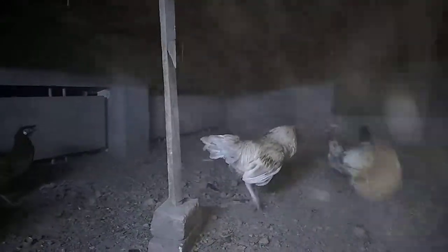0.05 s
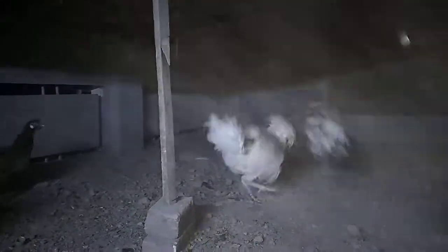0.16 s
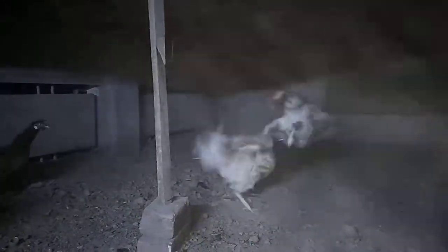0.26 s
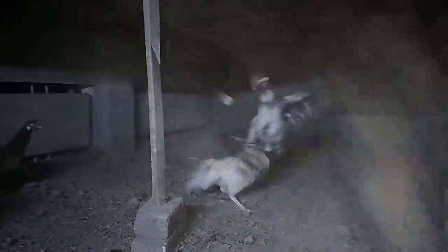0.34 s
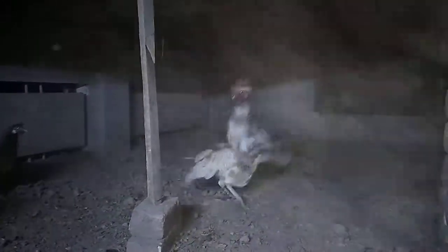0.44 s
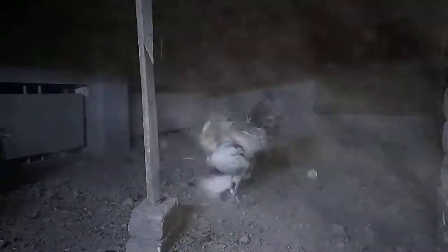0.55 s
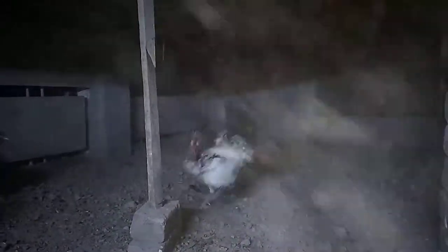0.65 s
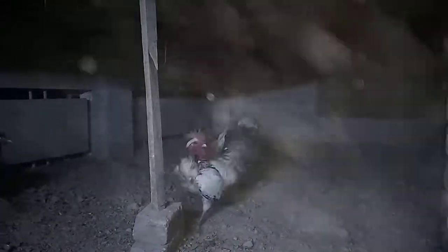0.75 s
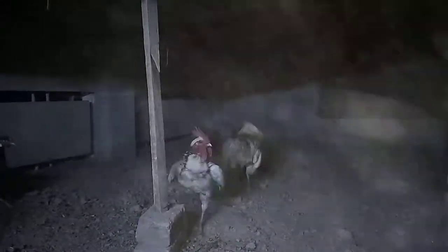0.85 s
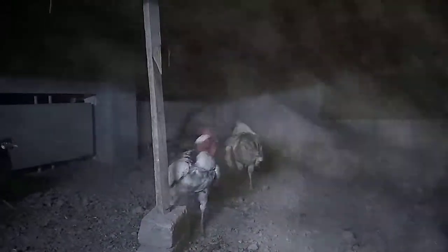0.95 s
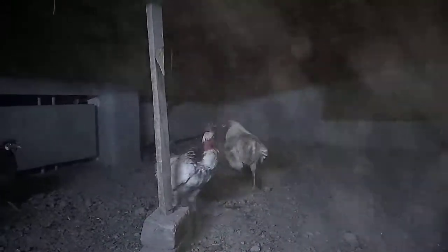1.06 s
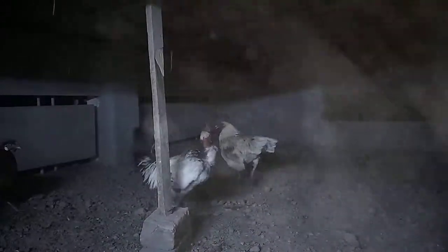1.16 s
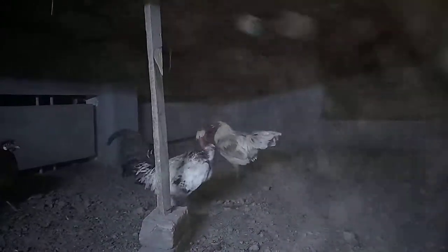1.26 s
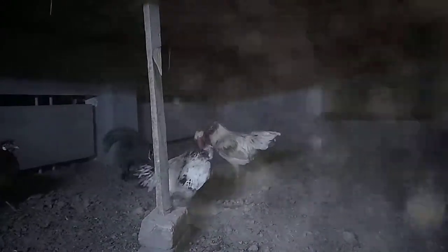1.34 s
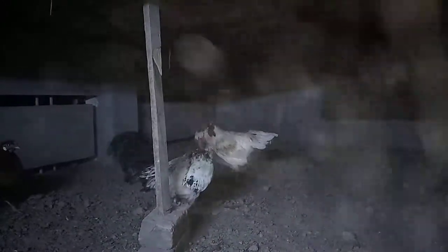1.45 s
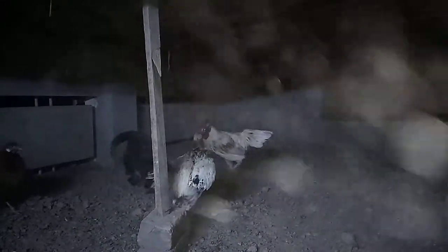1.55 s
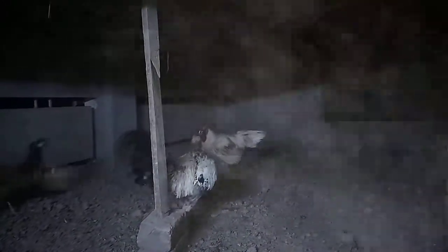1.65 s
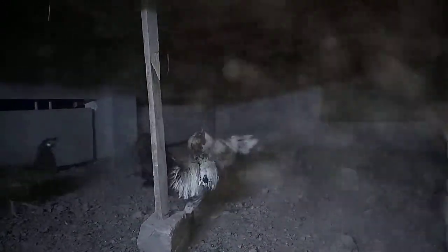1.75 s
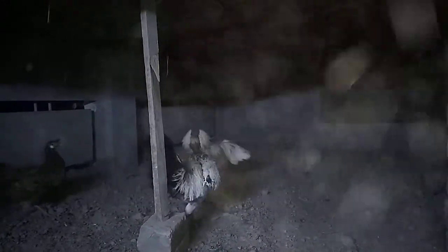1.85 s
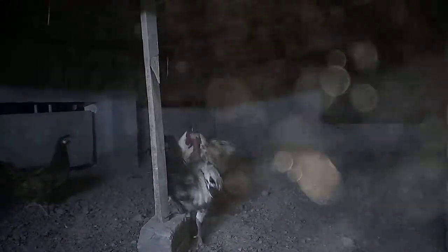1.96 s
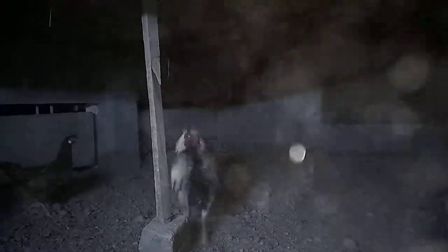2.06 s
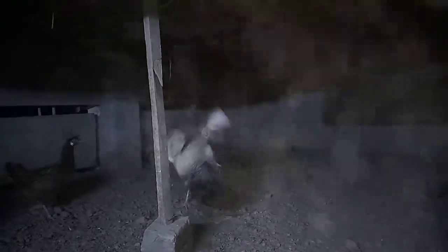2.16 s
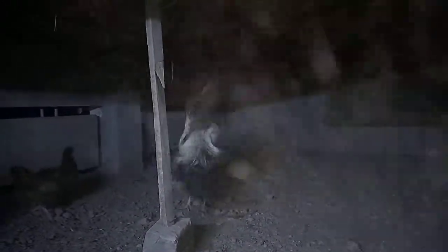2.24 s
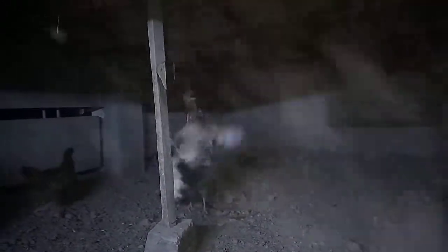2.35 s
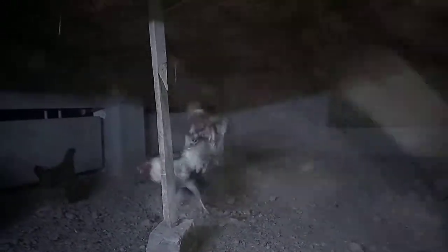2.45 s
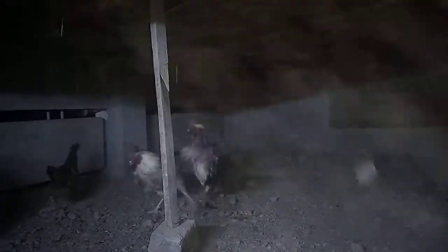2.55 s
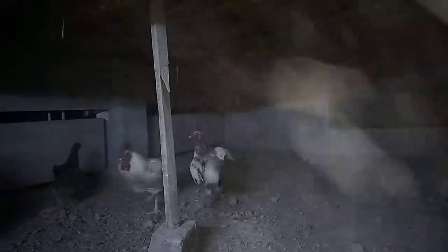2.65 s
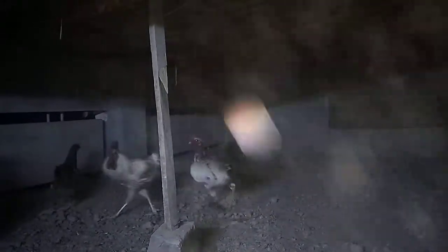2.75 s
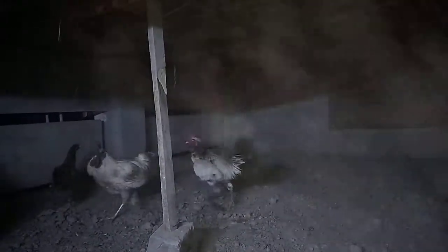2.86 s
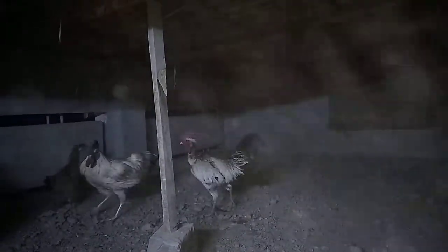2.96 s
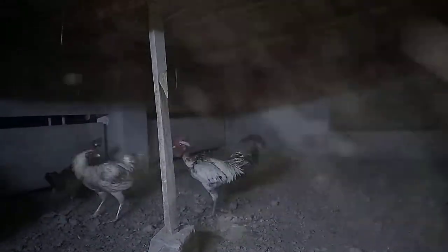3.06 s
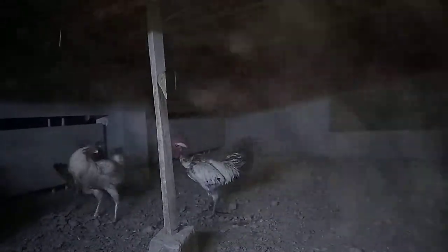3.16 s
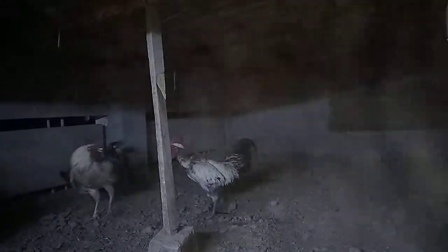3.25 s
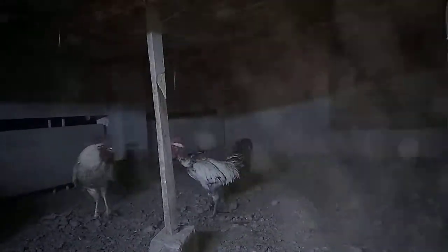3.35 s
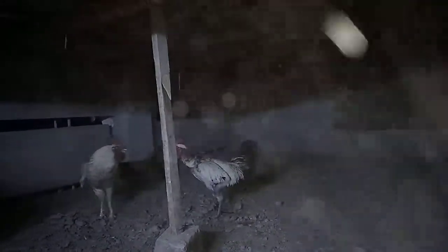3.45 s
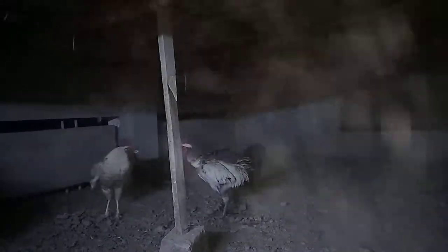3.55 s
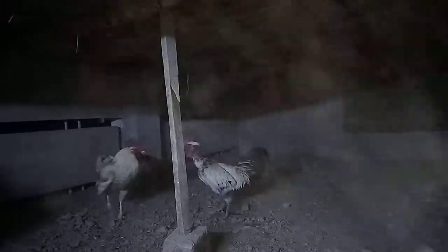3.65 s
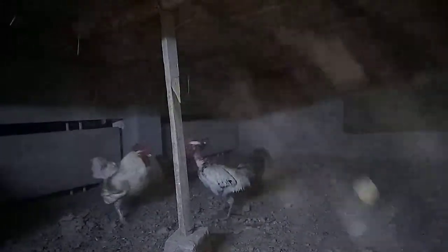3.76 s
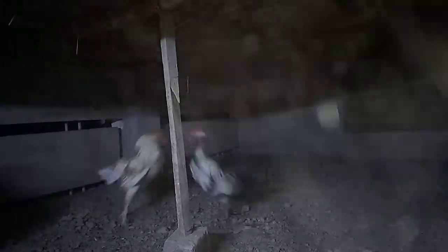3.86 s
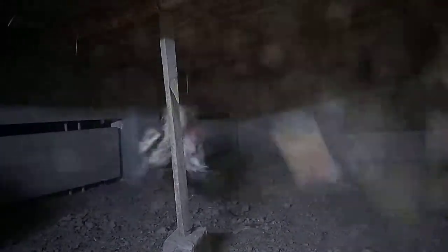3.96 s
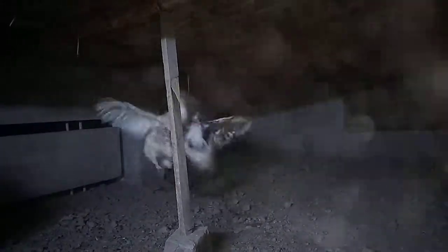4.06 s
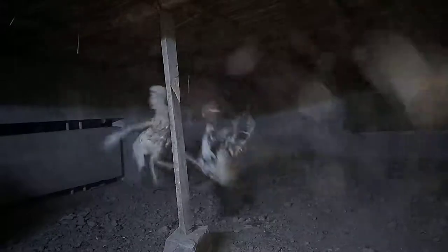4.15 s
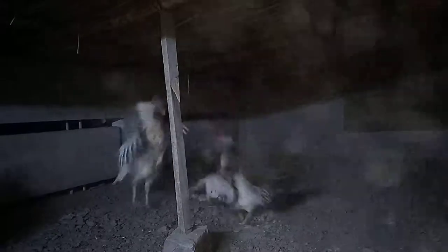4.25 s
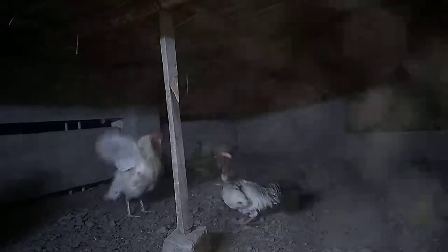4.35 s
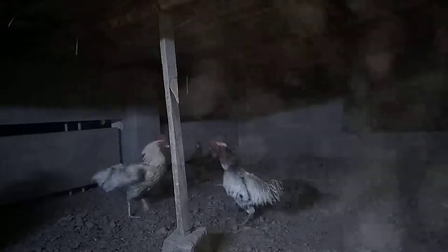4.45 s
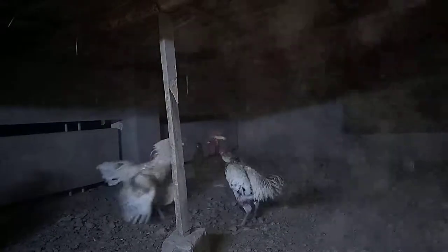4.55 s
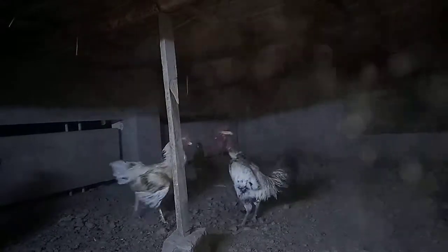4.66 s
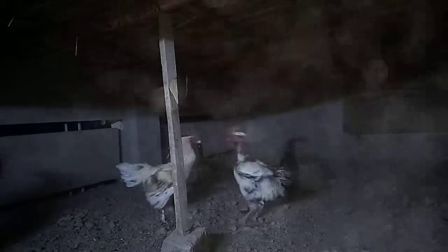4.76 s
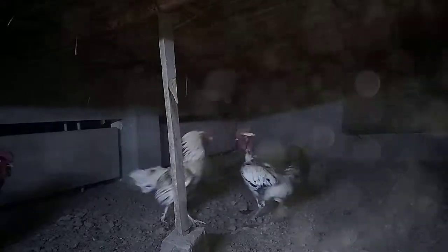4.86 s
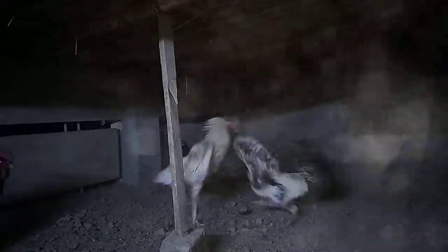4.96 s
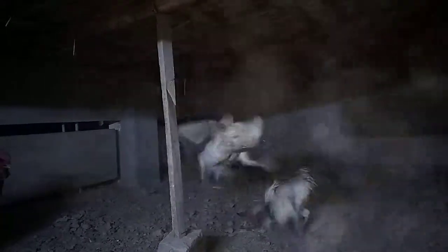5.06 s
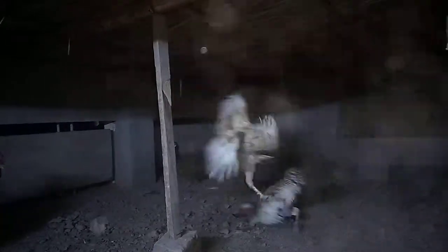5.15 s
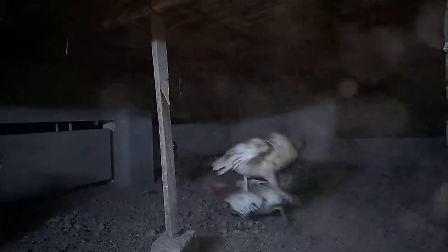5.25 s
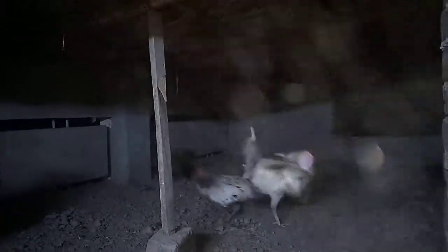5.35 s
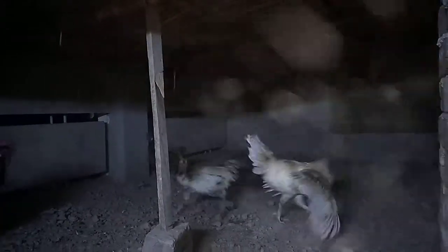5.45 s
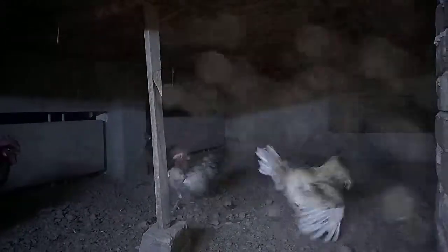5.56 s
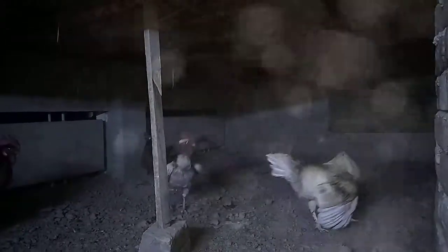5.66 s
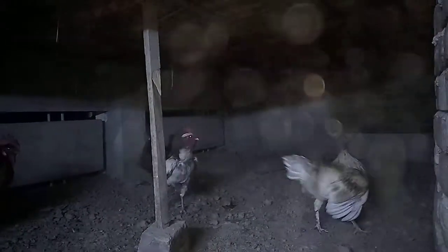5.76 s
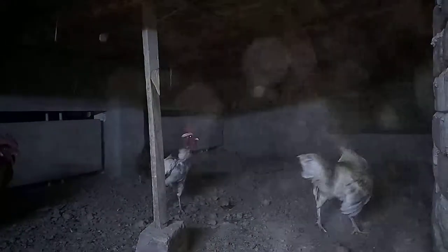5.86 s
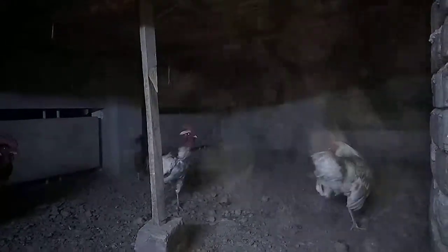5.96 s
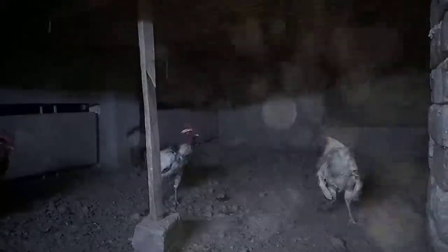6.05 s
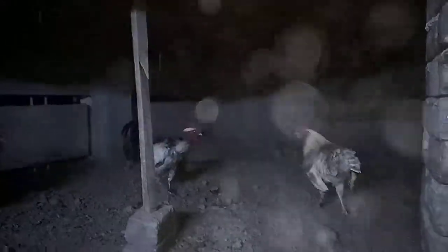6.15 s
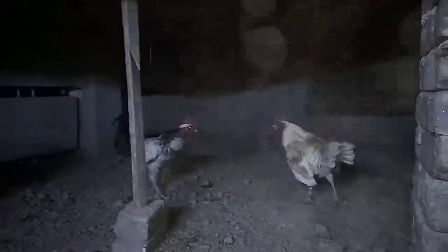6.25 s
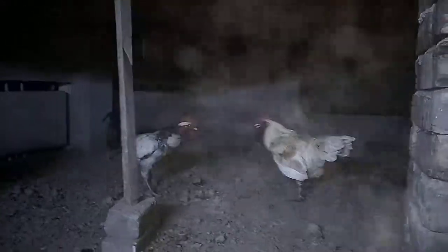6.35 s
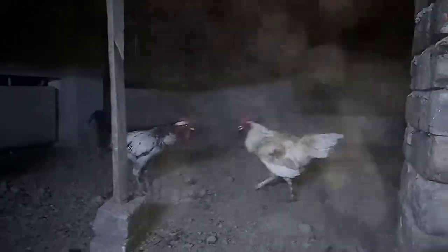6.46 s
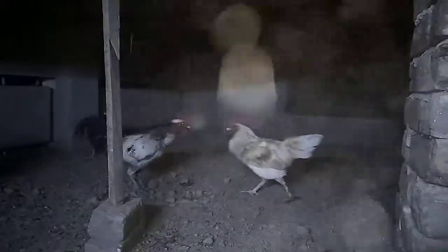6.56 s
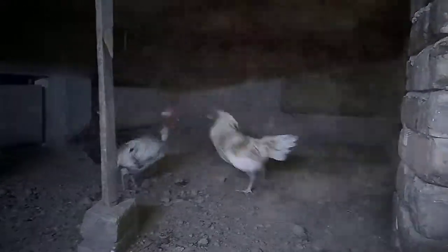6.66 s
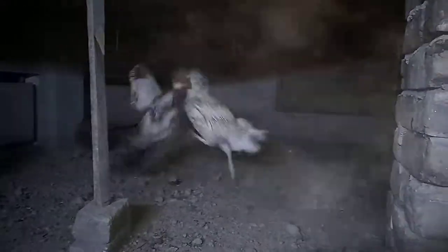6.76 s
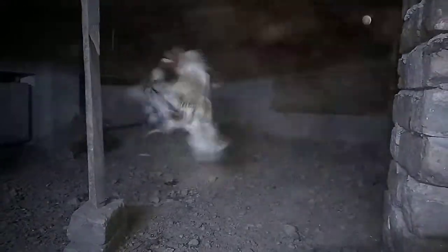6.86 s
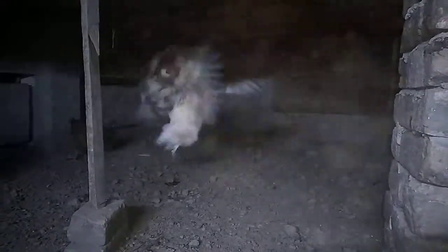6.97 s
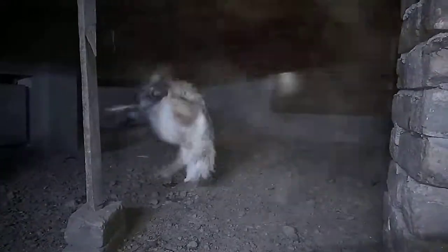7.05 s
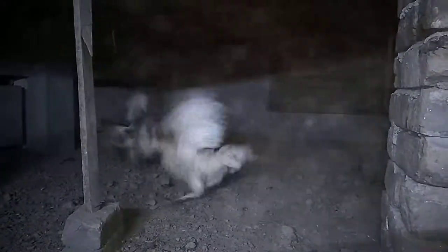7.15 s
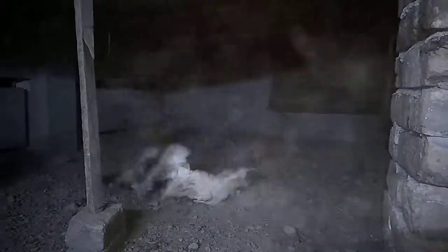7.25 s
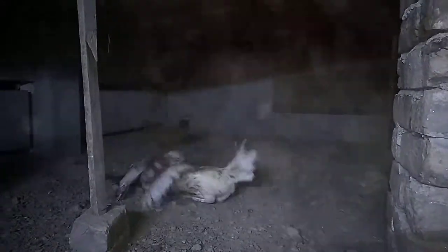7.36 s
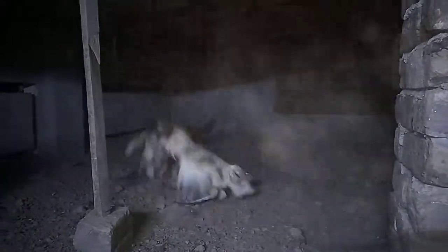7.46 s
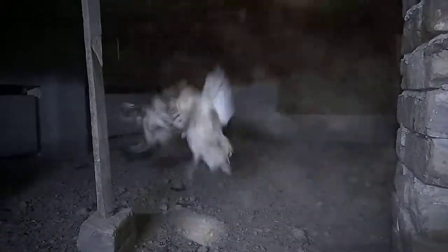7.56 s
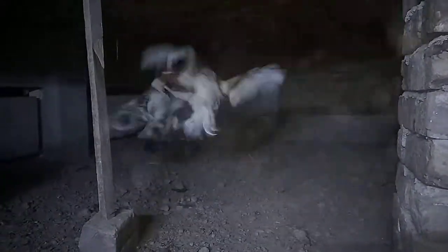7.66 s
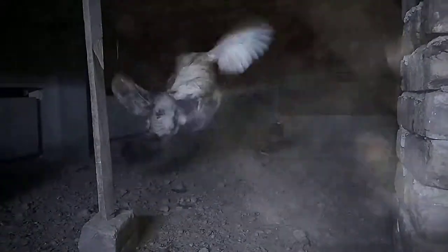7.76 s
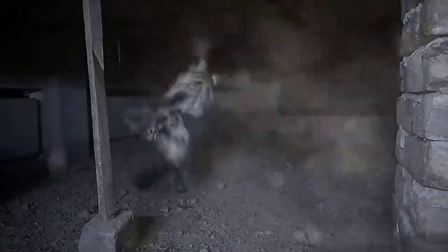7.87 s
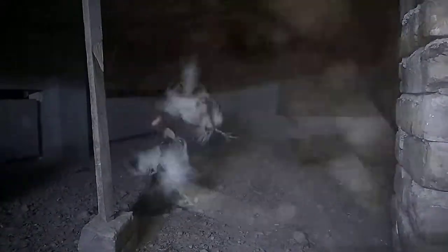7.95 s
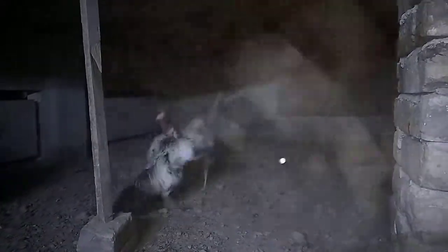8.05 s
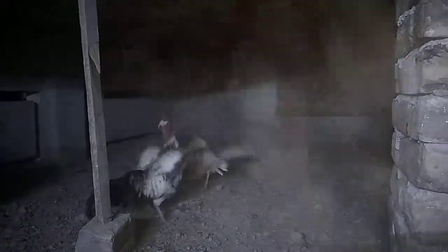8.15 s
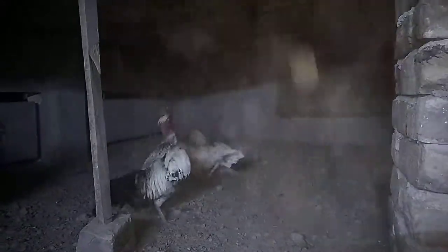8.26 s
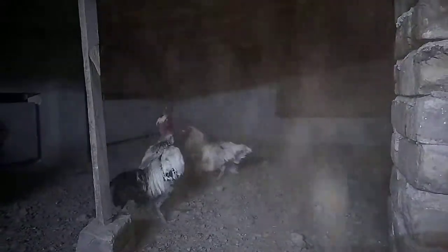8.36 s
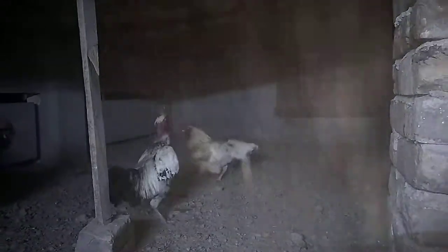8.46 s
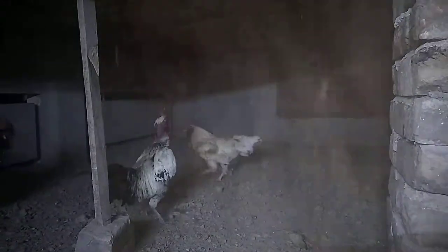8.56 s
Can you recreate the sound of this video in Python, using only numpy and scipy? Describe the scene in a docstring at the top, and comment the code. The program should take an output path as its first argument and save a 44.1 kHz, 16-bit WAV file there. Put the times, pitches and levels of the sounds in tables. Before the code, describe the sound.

Two roosters fight on the dirt floor of a low shed. A hard flurry of wing slaps comes at once, then more bursts with feathery hiss, dull footfalls and rustling plumage. Hens cluck, yelp and whine softly in the lulls. After the densest flurry, a rooster crows very loudly near the microphone, its last clear note still sounding at the end. Short wall echoes, faint outdoor air.

```python
"""From the start, dull footfalls (struck low modes), soft clucks and yelps (pulse tones through a throat
resonance) and flurries of wingbeats (enveloped noise and damped hollow smacks) are heard: two roosters fight in
a low shed. Feathers rustle (crackling noise) throughout; hens also whine softly between the bouts, and at 3.7 s
a distant rooster calls faintly. Near the end a rooster crows close by (summed partials), hoarse at first, then
on one clear note still held as the scene stops. Short echoes answer the birds' voices and feathers, over faint
outdoor air (coloured noise)."""
import sys
import numpy as np
from scipy import signal
from scipy.fft import rfft, irfft, next_fast_len
from scipy.io import wavfile
from scipy.ndimage import uniform_filter1d, minimum_filter1d

SR = 44100
rng = np.random.default_rng(int(sys.argv[2]) if len(sys.argv) > 2 else 0)


def to_wav(sig):
    """Store sig (one row per channel, or 1-D mono) as 16-bit WAV at the path in sys.argv[1].

    Samples outside -1..1 are clipped; the rate is SR.
    """
    pcm = np.clip(np.atleast_2d(sig), -1, 1) * 32767
    pcm = np.round(pcm).astype(np.int16)
    wavfile.write(sys.argv[1], SR, pcm.T)  # frames by channels


N = 379686
TIME = np.arange(N) / SR

# All levels and gains in the tables are relative.
# noise spectrum of the outdoor air: (frequency [Hz], level [dB])
AIR_SPECTRUM = [(30, -26), (60, -12), (110, 1.5), (200, -5.5), (290, -18), (450, 0), (800, -6),
                (1100, -8.5), (1500, -6), (2200, -13), (5000, -21.5), (15000, -20.5)]
# likeness of left and right noise: (frequency [Hz], correlation [-1 to 1])
SIDE_LIKENESS = [(60, 0.95), (250, 0.97), (700, 0.62), (1500, 0.042), (4000, 0.021), (12000, 0.04)]
# left minus right level of the noise: (frequency [Hz], difference [dB])
SIDE_BALANCE = [(60, -1), (300, -4), (1000, 1.5), (4000, -3.5), (12000, 1.5)]
# wall echoes: (delay [s], left gain [dB], right gain [dB])
WALL_ECHOES = [(.0043, -14, -19), (.0079, -19, -13), (.0137, -14, -18), (.0191, -19, -15),
               (.0322, -12, -13)]
# low clucks of the hens: (time [s], level [dB], throat resonance [Hz])
HEN_CLUCKS = [(0.047, -40, 526), (0.233, -32, 780), (1.163, -30.5, 757), (3.342, -31.5, 640),
              (3.526, -31, 640), (4.56, -58.5, 890), (5.895, -58, 650), (5.96, -57, 560), (6.006, -42, 810),
              (7.33, -35.5, 664)]
# short falling yelps: (time [s], pitch [Hz], level [dB], throat resonance [Hz], roughness [0-1])
HEN_YELPS = [(0.539, 569, -46, 560, 0.67), (1.353, 512, -43.5, 640, 0.31), (1.538, 475, -42.5, 1050, 0.56),
             (2.584, 660, -43, 1250, 0.19), (2.605, 530, -46, 1020, .1), (4.363, 610.5, -34.5, 1160, 0.18),
             (4.378, 490.3, -43, 910, 0.68), (4.49, 584, -54, 555, 0.55), (4.742, 497, -47.5, 1110, 0.44),
             (6.098, 677, -46, 593, 0.37), (6.118, 495, -48, 1450, 0.23), (6.283, 536, -49.5, 724, 0.28),
             (6.488, 563, -47.5, 710, 0.24), (7.178, 569, -38.5, 1080, 0.45)]
# soft whines of the hens, plus one faint call of a distant rooster (the row at 3.682 s): (time [s], length [s],
# pitch [Hz], fall [share of pitch], level [dB], throat resonance [Hz])
WHINES_AND_FAR_CALL = [(1.382, 0.24, 511, 0.25, -51.5, 624), (2.01, 0.12, 509, 0.18, -53, 770),
                       (2.634, 0.12, 504, 0.16, -60, 980), (2.709, 0.084, 423, -0.041, -45.5, 1250),
                       (2.763, 0.17, 410.5, .055, -58.5, 770), (3.398, 0.14, 451.4, -0.07, -56.5, 755),
                       (3.586, 0.049, 411, -0.018, -52, 1040), (4.891, 0.086, 444, -0.27, -49, 870),
                       (5.359, .094, 438, 0.45, -51.5, 420), (3.682, 0.074, 772, .01, -69, 1540),
                       (5.489, 0.056, 456, 0.034, -57.5, 900), (6.038, 0.093, 523, 0.043, -51.5, 1000),
                       (6.151, .17, 492, 0.13, -54, 810)]
# three crowed notes, one pitch curve each: (time [s], pitch [Hz])
CROW_PITCH_CURVES = [
    [(7.378, 584), (7.43, 688.6), (7.475, 717.5), (7.555, 734.5), (7.615, 584)],
    [(7.668, 590), (7.697, 805), (7.73, 800), (7.775, 630), (7.797, 735), (7.848, 742), (7.885, 610),
     (7.942, 965), (7.985, 930)],
    [(7.96, 723.1), (8.13, 764.3), (8.18, 751.4), (8.255, 691.2), (8.31, 722.1), (8.44, 745), (8.52, 740.8),
     (8.9, 713)],
]
# one entry for each crowed note: level [dB]
CROW_NOTE_LEVELS = [-16.5, -13.5, -13]
# overtone levels: (time [s], second partial [dB], third partial [dB], higher partials [dB])
CROW_OVERTONE_LEVELS = [(7.378, 0, 7.5, 2.5), (7.47, -2.5, -11.5, 0.5), (7.72, 4.5, -0.5, 3),
                        (7.9, 4.5, 0, 2.5), (8.14, 0, -4.5, -3.5), (8.3, 7, 6.5, 10.5),
                        (8.371, 0, -0.5, -2.5), (8.6, -6.5, -1, -7.5)]
# throat and beak response of the crow: (frequency [Hz], level [dB])
CROW_THROAT_RESPONSE = [(550, -8), (740, -0.5), (1450, 0), (1850, -8.5), (2250, -2), (2500, -6.5),
                        (2950, -30), (3650, -6), (4400, -34.5), (5200, -26), (6500, -34), (8200, -31.5),
                        (9600, -39.5), (11000, -32), (15500, -38.5)]
# phase lead of the left side over the right in the crow: (frequency [Hz], lead [rad])
CROW_LEFT_LEAD = [(740, 0.1), (1480, -2.5), (2220, -0.5), (3700, 0.7), (5200, -1.5), (9000, 2)]
# heaviest footfalls: (time [s], level [dB])
HEAVY_STEPS = [(0.016, -45), (0.721, -56), (1.068, -52), (1.295, -50), (1.388, -47), (1.659, -46),
               (1.699, -40), (1.799, -46), (2.85, -49.5), (3.646, -42.5), (4.222, -43), (4.37, -40.5),
               (4.451, -44.5), (4.57, -47), (4.947, -46.5), (5.477, -46.5), (5.57, -46.5), (6.219, -47.5),
               (3.1, -50.5), (5.23, -54), (5.875, -51), (5.972, -51), (6.44, -52), (6.64, -53),
               (6.759, -44.5), (7.8, -40), (7.95, -46), (8.16, -40)]
# single shifts of the feathers: (time [s], level [dB])
FEATHER_SHUFFLES = [(0.084, -52), (0.555, -50), (0.65, -50.5), (0.98, -56), (1.97, -52.5), (2.04, -53.5),
                    (2.098, -49), (2.52, -46.5), (2.82, -58), (3.2, -62), (3.94, -50.5), (5.085, -46),
                    (5.6, -54.5), (5.75, -63), (6.65, -55), (6.78, -49)]
# wingbeats and kicks: (time [s], slap level [dB], feather hiss level [dB])
WING_STROKES = [(0.255, -20, -24.5), (0.294, -27, -28.5), (0.399, -38, -34.5), (0.489, -42.5, -42),
                (0.746, -46, -46), (1.026, -105, -47.5), (1.839, -59, -50), (2.205, -27, -42.5),
                (2.25, -29, -31.5), (2.329, -30.5, -32.5), (2.44, -41, -43), (2.556, -45.5, -52),
                (3.873, -56.5, -49), (3.996, -38, -44), (4.056, -33.5, -43), (4.094, -34, -32.5),
                (4.255, -42.5, -44), (4.302, -42.5, -48.5), (4.996, -29.5, -33), (5.149, -40.5, -42),
                (5.369, -50.5, -46), (5.52, -51.5, -49.5), (6.849, -37, -57), (6.886, -29.5, -29.5),
                (6.936, -28, -35.5), (6.983, -29, -35.5), (7.041, -24, -25.5), (7.128, -34.5, -42),
                (7.186, -33, -46), (7.263, -31, -39), (7.289, -30, -31.5), (7.323, -29, -41),
                (7.628, -26.5, -20.5)]
# noise spectrum of the air a wing shoves: (frequency [Hz], level [dB])
THUD_SPECTRUM = [(30, -18), (60, -0.5), (120, 1.5), (250, -1.5), (400, -8.5), (800, -31), (2000, -25.5)]
# noise spectrum of a wing slap: (frequency [Hz], level [dB])
SLAP_SPECTRUM = [(150, -18.5), (400, 4.5), (650, 0.5), (1200, -2.5), (2000, -3.5), (3000, -11.5),
                 (6000, -17.5), (15000, -29)]
# noise spectrum of feathers: (frequency [Hz], level [dB])
FEATHER_SPECTRUM = [(500, -18.5), (1500, -2), (2500, -4), (4200, -3.5), (6500, -2), (10000, 0), (13000, -8),
                    (16000, -8.5)]

CUTOFF_HZ = 15800
# fall: share of the pitch lost by the end
CLUCK_S, CLUCK_HZ, CLUCK_FALL, CLUCK_ROUGH = 0.035, 327.4, 0.098, 0.22
YELP_S, YELP_FALL = 0.048, 0.154
WHINE_ROUGH = 0.14
CROW_ATTACK_S, CROW_RELEASE_S = 0.011, 0.048
CROW_SETTLE = .13   # decay constant of the hoarse start, as a share of the note
CROW_FRAY_S = 0.057   # growth constant of the hoarseness towards a note's end
CROW_SWAY_HZ_PER_S = 620   # a glide this fast brings the sway of the partials to its most
CROW_BREAK_HZ_PER_S = 5760   # a glide this fast breaks the voice up entirely
LIGHT_STEP_S = .26   # mean spacing of the light steps, which go on throughout
LIGHT_STEP_DB, LIGHT_STEP_SPREAD_DB = -58.5, 1.5
RUSTLE_DB, RUSTLE_RISE_S, RUSTLE_T60_S = -17.5, 0.34, 0.71   # level is against the feather hiss of a beat
RUSTLE_LIMIT_DB = -50   # fully ruffled plumage
FIDGET_DB = -69   # birds that only stand and shift
THUD_DB, THUD_LIMIT_DB = -4, -27.5   # level against the slap, and the most that a wing can give
PAT_DB, PAT_SPAN_S, PAT_CYCLES = 0.5, .03, 14.3   # cycles: count in which a smack decays by 60 dB


def from_db(db):
    """Logarithmic level: convert decibels to amplitude gain."""
    return 10 ** (np.asarray(db) / 20)


def rms_one(x):
    """Normalisation: scale to unit mean power."""
    return x / np.sqrt(np.mean(x ** 2) + 1e-20)


def at_hz(points, hz):
    """Spectral interpolation: read a curve on a log-frequency axis."""
    f, value = np.transpose(points)
    return np.interp(np.log(hz), np.log(f), value)


def filtered(x, hz, kind):
    """Linear filtering: a Butterworth section of design order 2."""
    sections = signal.butter(2, hz, kind, fs=SR, output="sos")
    return signal.sosfilt(sections, x + 1e-18)


def wander(hz, count=N):
    """Band-limited chance: low-passed Gaussian noise of spread about 1."""
    # the first second lets the filter settle
    return rms_one(filtered(rng.standard_normal(count + SR), hz, "low"))[SR:]


def panned(x, pan_db):
    """Interaural level difference: place a sound by left minus right level."""
    return x * from_db(np.array([[.5], [-.5]]) * pan_db)


def placed(x, s):
    """Time shift: set a short sound at its moment in the scene."""
    return np.concatenate([np.zeros(int(s * SR)), x, np.zeros(N)])[:N]


def noise(spectrum):
    """Spectral shaping: coloured stereo noise of rms 1, its sides correlated in the bass."""
    size = next_fast_len(N)
    hz = np.maximum(np.fft.rfftfreq(size, 1 / SR), 1)
    mid, side = rfft(rng.standard_normal((2, size)))
    alike = np.clip(at_hz(SIDE_LIKENESS, hz), -1, 1)
    pair = np.sqrt(1 + alike) * mid + np.sqrt(1 - alike) * side * [[1], [-1]]
    bass_cut = hz ** 2 / (hz ** 2 + 25 ** 2)
    colour = from_db(at_hz(spectrum, hz)) * bass_cut
    balanced = panned(pair * colour, at_hz(SIDE_BALANCE, hz))
    return rms_one(irfft(balanced, size)[:, :N])


def strokes(times, levels_db, rise, t60):
    """Energy superposition: blows swell briefly, then decay exponentially; their powers add."""
    power = np.zeros(N)
    for s, db in zip(times, levels_db):
        near = slice(max(int((s - 2 * rise) * SR), 0), int((s + rise + t60) * SR))
        t = TIME[near] - s - rise / 2
        drop_db = np.maximum(-20 * t / rise, 60 * t / t60)
        power[near] += from_db(2 * (db - drop_db))
    return np.sqrt(power)


def crackle(depth_db, grain_hz):
    """Random amplitude modulation: quills snap past each other, breaking a hiss into tiny grains."""
    return rms_one(from_db(depth_db * np.clip(wander(grain_hz), -2.5, 2.5)))


def shed(x, wet_db, echo_db, t60=0.19, damping_hz=6000):
    """Reflection by convolution: distinct echoes from the near walls and a short dull tail."""
    t = TIME[:SR // 2]
    tail = rng.standard_normal((2, len(t))) * from_db(-60 * t / t60) * np.minimum(t / 0.0079, 1)
    tail = tail / np.sqrt(np.sum(tail ** 2) / 2)
    response = filtered(tail, damping_hz, "low") * from_db(wet_db)
    for delay, left_db, right_db in WALL_ECHOES:
        response[:, int(delay * SR)] += from_db(np.array([left_db, right_db]) + echo_db)
    return x + signal.fftconvolve(x, response, axes=1)[:, :N]


def outdoor_air():
    """Broadband background: steady coloured noise with a slightly wavering level."""
    return from_db(-63.0 + 1.6 * wander(12.0)) * noise(AIR_SPECTRUM)


def hen_call(s, length, start_hz, fall, db, throat_hz, rough, width_hz=330, jitter=0.12, rasp=0.8,
             skirt_db=-20, top_hz=1700):
    """Source-filter principle: a gliding pulse tone in one throat resonance, shaken in pitch and strength."""
    order = np.arange(1, 10)[:, None]
    count = int(length * SR)
    u = np.linspace(0, 1, count)
    arch = 1 + 0.045 * (np.sin(np.pi * u) - .7)   # pitch arches with the push
    pitch = start_hz * (1 - fall * u) * arch
    pitch = pitch * (1 + 0.016 * wander(20.4, count=count))
    shaken = pitch * (1 + jitter * rough * wander(178, count=count))
    phase = 2 * np.pi * np.cumsum(shaken) / SR
    hz = order * pitch
    throat = 1 / (1 + (2 * (hz - throat_hz) / width_hz) ** 2) + from_db(skirt_db)
    throat = throat / (1 + (hz / (top_hz * (0.55 + rough))) ** 6)   # a rougher call is also brighter
    voice = np.sum(throat * np.sin(order * phase), axis=0)
    voice = voice * (1 + rasp * rough * wander(340, count=count))
    swell = np.abs(np.sin(np.pi * u ** .8)) ** .9
    return placed(from_db(db + 0.5) * rms_one(voice) * swell, s)


def hens_and_far_rooster():
    """Common source-filter model: clucks, yelps and whines come from the same kind of throat, and so does the
    faint call of a distant rooster."""
    clucks = sum(hen_call(s, CLUCK_S, CLUCK_HZ, CLUCK_FALL, db, throat_hz, CLUCK_ROUGH, skirt_db=-26)
                 for s, db, throat_hz in HEN_CLUCKS)
    yelps = sum(hen_call(s, YELP_S, hz, YELP_FALL, db, throat_hz, rough, skirt_db=-15, top_hz=2080)
                for s, hz, db, throat_hz, rough in HEN_YELPS)
    whines = sum(hen_call(*row, WHINE_ROUGH) for row in WHINES_AND_FAR_CALL)
    return panned(filtered(clucks + yelps + whines, 210, "high"), pan_db=1.5)


def crow_note(curve, level_db, jitter=0.032, shake=0.44, half_tone=0.058, rasp_db=-13, sway_db=4, sway_hz=8):
    """Source-filter principle: the syrinx buzzes through throat and beak, its cycles unstable when hoarse."""
    s, curve_hz = np.transpose(curve)
    length = s[-1] - s[0]
    count = int(length * SR)
    age = np.arange(count) / SR
    pitch = np.interp(s[0] + age, s, curve_hz)
    glide = uniform_filter1d(np.abs(np.gradient(pitch)) * SR, size=900)   # Hz per s
    # a note is hoarse as it starts, ends or glides fast
    start = np.exp(-age / (CROW_SETTLE * length))
    end = np.exp((age - length) / CROW_FRAY_S)
    hoarse = np.minimum(start + end + glide / CROW_BREAK_HZ_PER_S, 1)
    moving = np.minimum(.5 + glide / CROW_SWAY_HZ_PER_S, 1.5)
    when, *overtones = np.transpose(CROW_OVERTONE_LEVELS)
    second_db, third_db, higher_db = (np.interp(s[0] + age, when, c) for c in overtones)
    phase = 2 * np.pi * np.cumsum(pitch * (1 + jitter * hoarse * wander(106, count=count))) / SR
    voice, power = 0, 0
    for k in range(1, 22):
        hz = k * pitch
        opening_db = {1: 0, 2: second_db, 3: third_db}.get(k, higher_db)
        # the weak overtones are unsteady
        flicker_db = 4.5 * wander(9, count=count) + 2 * wander(45, count=count) + 1
        flicker_db = flicker_db * (k >= 4 and k != 5)
        gain = from_db(at_hz(CROW_THROAT_RESPONSE, hz) + opening_db + flicker_db) * (hz < SR / 2)
        gain = gain * (1 - 0.039 * hoarse * (k > 5))   # a hoarse voice loses some of its top
        # each partial reaches the two sides in a different, drifting phase
        drift = .5 * np.log(1 + k) * moving * wander(sway_hz, count=count)
        lag = (at_hz(CROW_LEFT_LEAD, hz) + drift) * np.array([[0], [1]])
        # each throat resonance turns the phase further, which rounds the pulses
        partial = gain * np.sin(k * phase - lag - np.pi * k ** 2 / 4)
        # each partial sways between the sides on its own, more as its pitch sweeps
        voice = voice + panned(partial, sway_db * moving * wander(sway_hz, count=count))
        power = power + gain ** 2 / 2
    # sin(phase / 2) makes successive cycles alternate in strength
    stumble = 1 + hoarse * (shake * wander(79, count=count) + half_tone * np.sin(phase / 2))
    puffs = 1 + np.cos(phase)   # the breath noise pulses once a cycle
    rasp = from_db(rasp_db) * hoarse ** 2 * noise(CROW_THROAT_RESPONSE)[:, :count] * puffs
    rasp = rasp + from_db(-37) * hoarse * noise(FEATHER_SPECTRUM)[:, :count] * puffs   # airy top
    envelope = np.minimum(np.minimum(age / CROW_ATTACK_S, (length - age) / CROW_RELEASE_S), 1)
    sound = (voice / np.sqrt(power) * stumble + rasp) * from_db(level_db) * envelope
    return np.array([placed(side, s[0]) for side in sound])


def crow():
    """Frequency modulation over time: a rising note, a cracked warbling one, then a long one that clears."""
    notes = sum(crow_note(curve, db) for curve, db in zip(CROW_PITCH_CURVES, CROW_NOTE_LEVELS))
    return filtered(panned(notes, pan_db=-0.26), 270, "high")


def steps(rise=0.024):
    """Modal excitation: footfalls, a few heavy and many light, set the low modes of the shed booming."""
    push, out = np.zeros(N), np.zeros(N)
    light_s = np.cumsum(LIGHT_STEP_S * (.5 + rng.random(size=50)))
    light_db = rng.normal(LIGHT_STEP_DB, LIGHT_STEP_SPREAD_DB, len(light_s))
    light = np.column_stack([light_s, light_db])
    s, db = np.vstack([HEAVY_STEPS, light[light_s < TIME[-1]]]).T
    at = (s * SR).astype(int)
    t = TIME[:SR // 2]
    # modes: (frequency [Hz], level [dB], decay time [s])
    for hz, level_db, t60 in [(57.6, -11.5, 0.41), (105.3, 1.5, 0.15), (147.0, 7.5, 0.036)]:
        push[at] = from_db(db + level_db + rng.normal(0, 5.2, len(s)))
        ring = np.sin(2 * np.pi * hz * t) * from_db(-60 * t / t60) * np.minimum(t / rise, 1)
        out += signal.fftconvolve(push, ring)[:N]
    return panned(from_db(6.5) * filtered(out, 270, "low"), pan_db=-5.0)


def rustle(fidget_db=3, depth_db=2.5, scuff_db=3):
    """Friction noise: plumage rustles and feet scuff the dirt, settling slowly after each beat in little fits."""
    s, _, feather_db = np.transpose(WING_STROKES)
    ruffle_db = np.minimum(feather_db + RUSTLE_DB, RUSTLE_LIMIT_DB)
    ruffle = strokes(s, ruffle_db, rise=RUSTLE_RISE_S, t60=RUSTLE_T60_S)
    stir = np.hypot(ruffle, from_db(FIDGET_DB))
    stir = np.hypot(stir, strokes(*np.transpose(FEATHER_SHUFFLES), rise=0.015, t60=0.24))
    plumage = from_db(-1.5 + fidget_db * wander(15)) * noise(FEATHER_SPECTRUM)
    plumage = plumage * crackle(depth_db, grain_hz=204)
    scuffs = from_db(-6.5 + scuff_db * wander(22)) * filtered(noise(SLAP_SPECTRUM), 360, "high")
    return stir * (plumage + scuffs)


def fluttering(spectrum, depth_db, rate_hz):
    """Independent band modulation: the colour of a noise changes as the feathers spread and fold."""
    rest, out = noise(spectrum), 0
    for hz in (500, 1200, 2800, 6000, 10500):
        band = signal.sosfiltfilt(signal.butter(2, hz, fs=SR, output="sos"), rest)
        rest = rest - band
        out = out + band * from_db(depth_db * wander(rate_hz))
    return rms_one(out + rest * from_db(depth_db * wander(rate_hz)))


def pats(times, levels_db, count=5):
    """Damped free vibration: a wing lands in a quick uneven run of hollow smacks, each with its own pitch."""
    out, t = np.zeros(N + SR), TIME[:SR // 10]
    for s, db in zip(times, levels_db):
        for k in range(count):
            hz = 380 * 6 ** rng.random()
            at = int((s + 0.00303 + PAT_SPAN_S * rng.random() * k / count) * SR)
            decay = from_db(db + PAT_DB - k - 60 * t * hz / PAT_CYCLES)
            out[at:at + len(t)] += np.sin(2 * np.pi * hz * t) * decay
    return out[:N]


def wings():
    """Aerodynamic and impact noise: a beat shoves air (thud), hits the other bird (slap), drags feathers (hiss)."""
    s, slap_db, feather_db = np.transpose(WING_STROKES)
    thud_db = np.minimum(slap_db + THUD_DB, THUD_LIMIT_DB)
    grains = crackle(depth_db=1.3, grain_hz=402)
    thud = strokes(s, thud_db, rise=0.038, t60=0.27) * noise(THUD_SPECTRUM)
    crack = strokes(s + 0.0034, slap_db, rise=0.0026, t60=0.013)
    slap = np.hypot(crack, strokes(s, slap_db - 0.5, rise=0.02, t60=0.16))
    slap = slap * fluttering(SLAP_SPECTRUM, depth_db=2.5, rate_hz=84)
    flick = strokes(s + 0.00055, feather_db + 3.5, rise=0.009, t60=0.013)
    hiss = np.hypot(flick, strokes(s, feather_db - 0.5, rise=0.022, t60=0.17))
    hiss = hiss * fluttering(FEATHER_SPECTRUM, depth_db=1.5, rate_hz=92)
    return thud + (slap + hiss) * grains + pats(s, slap_db)


def scene():
    """Superposition: the fight, the hens and the crow share the shed, over faint outdoor air."""
    air = outdoor_air()
    clucking = shed(hens_and_far_rooster(), wet_db=-3.5, echo_db=-5.5)
    call = shed(crow(), wet_db=-5, echo_db=-2)
    fight = shed(wings() + rustle(), wet_db=-16.5, echo_db=-6.0)
    return air + clucking + call + steps() + fight


def limiter(x, ceiling=.57, release_db_per_s=120):
    """Gain control: turn down just before a loud peak and recover slowly."""
    over_db = 20 * np.log10(np.maximum(np.abs(x).max(axis=0) / ceiling, 1))
    fall = release_db_per_s * TIME
    held_db = np.maximum.accumulate(over_db + fall) - fall
    lowest_db = minimum_filter1d(-held_db, size=90)
    return x * from_db(uniform_filter1d(lowest_db, size=90))


def record(dry):
    """Peak limiting and band limiting: loud peaks are held down, then the top is cut steeply."""
    top_cut = signal.ellip(10, .1, 90, CUTOFF_HZ, fs=SR, output="sos")
    return signal.sosfilt(top_cut, limiter(dry))


dry = scene()
out = record(dry)
to_wav(out)
```